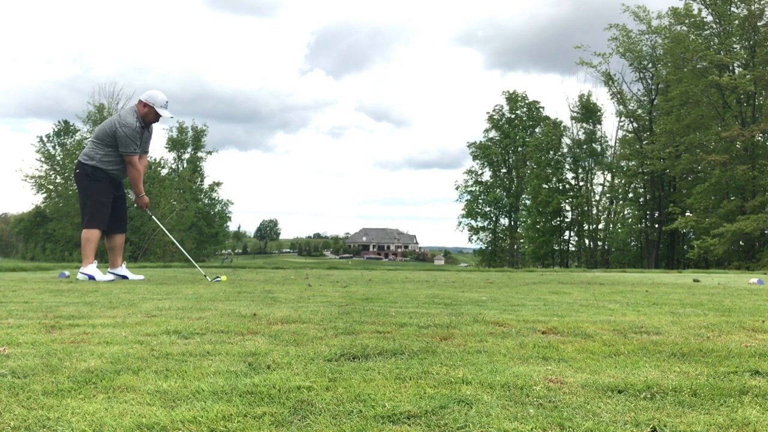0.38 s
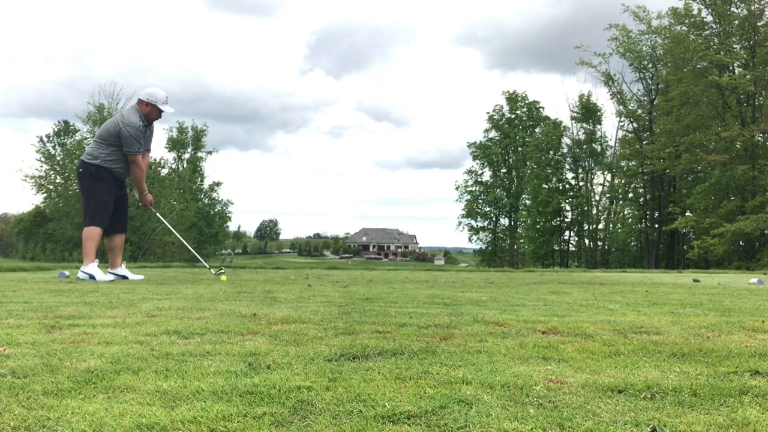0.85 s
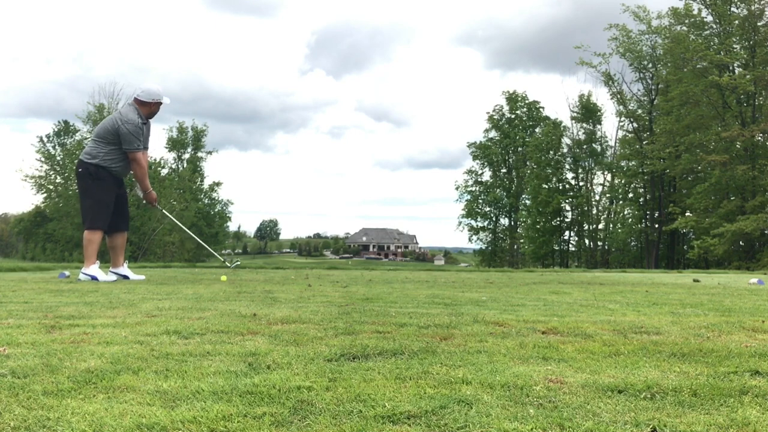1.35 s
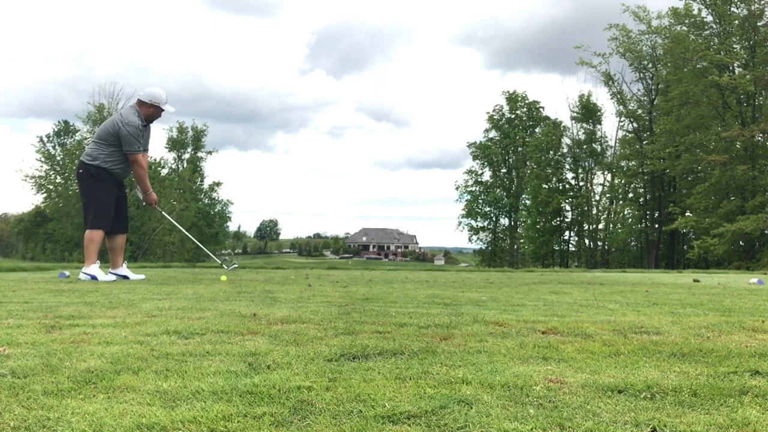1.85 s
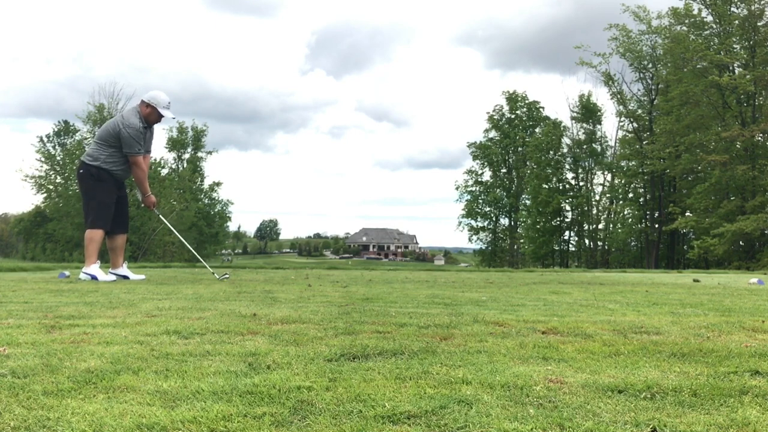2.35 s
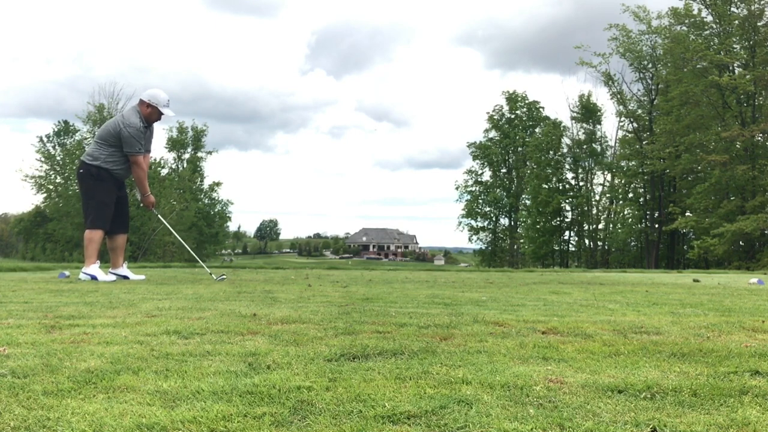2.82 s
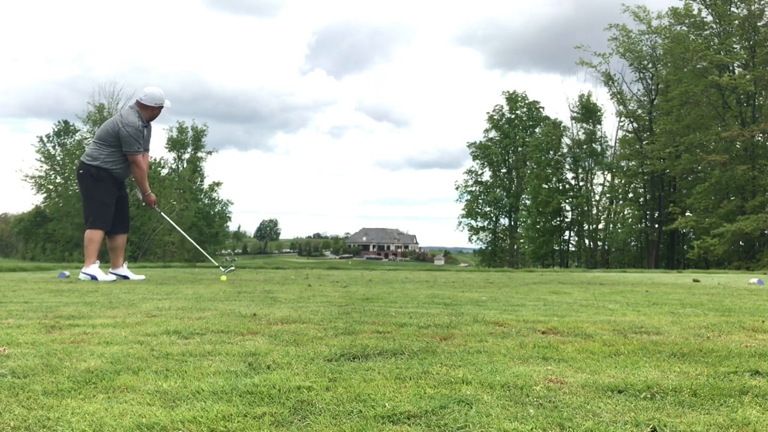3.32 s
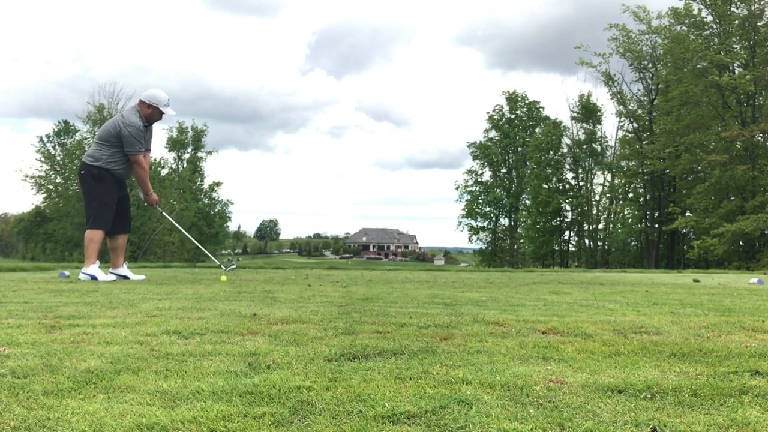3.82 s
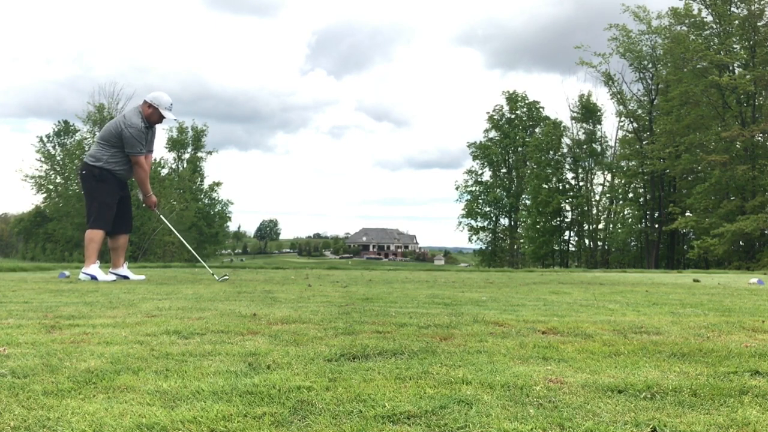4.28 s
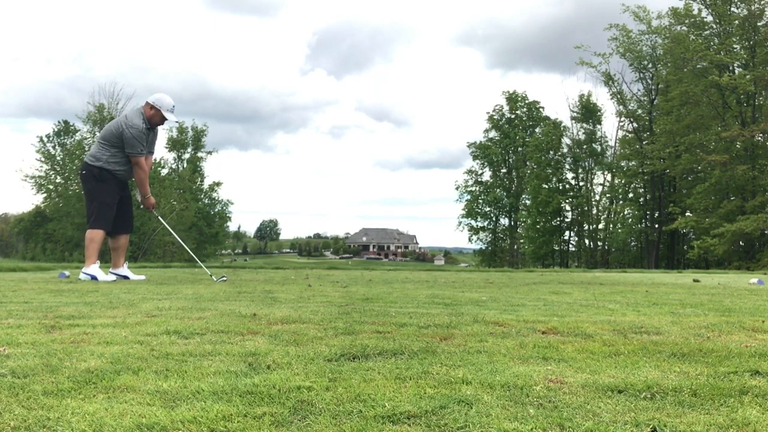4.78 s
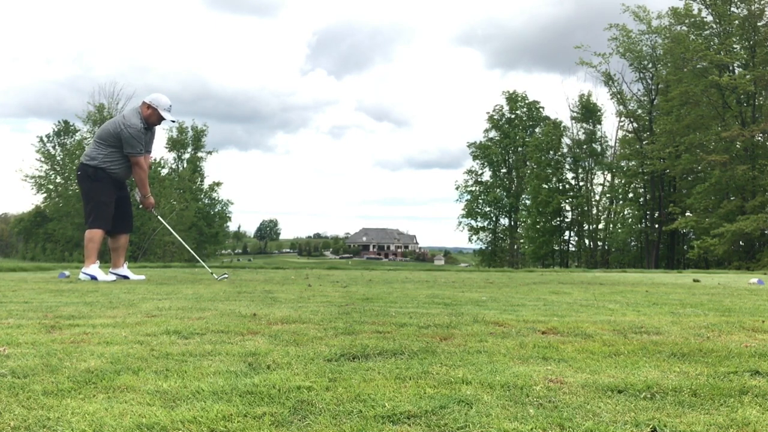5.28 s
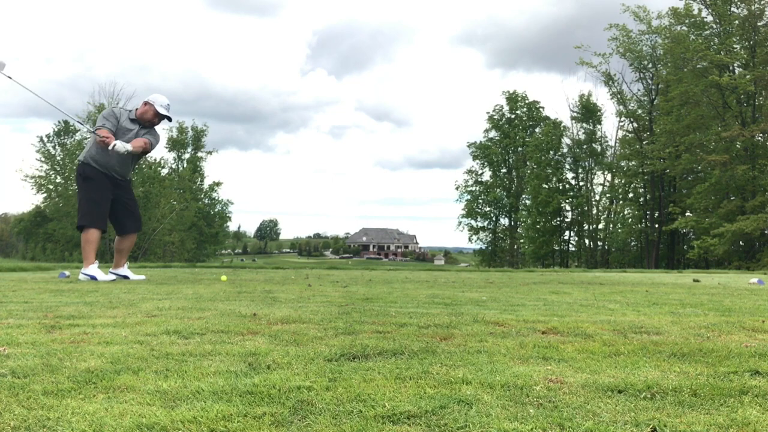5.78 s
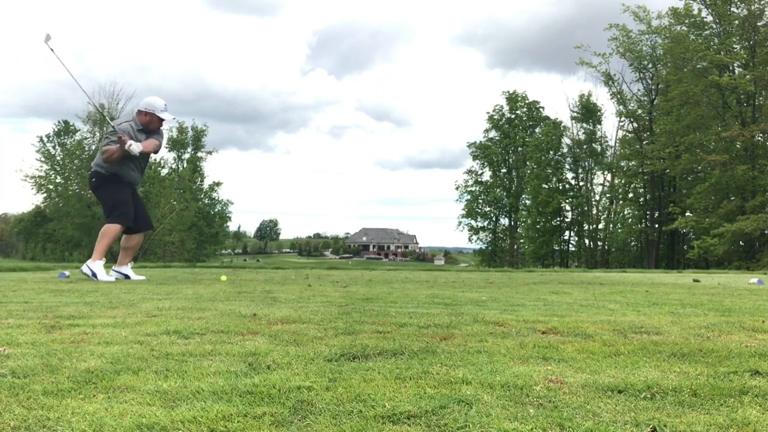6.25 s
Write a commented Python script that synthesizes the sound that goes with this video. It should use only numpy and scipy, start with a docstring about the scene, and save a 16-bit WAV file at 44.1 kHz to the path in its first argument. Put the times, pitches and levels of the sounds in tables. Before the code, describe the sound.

A quiet open golf course, heard by a small microphone close to the ground. Throughout there is low distant traffic rumble, soft road roar growing slightly, a faint wavering engine drone and thin steady hiss. Faint birds give short downward-gliding whistles, smeared by trees: a small cluster at 0.9 to 1.5 seconds, more around 2.1 to 2.3, fainter ones between 3 and 4, then a last few from 5.1 to 5.9. At about 2.24 seconds the club head touches the turf with a tiny tick and soft tap, followed by a short crisp scuff of grass. From about 6.4 seconds a quick swish rises with a low whoosh, and at 6.47 the club strikes the ball: one very loud, dry, bright crack with a hollow pop, extremely short metallic ring and slight ground thud. Rapid reflections and a faint scattered tree echo follow.

```python
"""An open golf course: a club swings through a teed ball, heard by a small microphone close to the ground.
The swing is a rising swish of filtered noise; the strike is a sharp crack of damped sines, a gliding pop
and noise, with echoes off ground and trees. Before it the club head brushes the grass once (clumpy noise),
and far birds chirp (gliding whistles) over traffic rumble, road roar, engine lines and hiss."""
import sys
import numpy as np
from scipy import signal
from scipy.fft import rfft, irfft, next_fast_len
from scipy.io import wavfile
from scipy.ndimage import map_coordinates

SR = 44100
rng = np.random.default_rng(int(sys.argv[2]) if len(sys.argv) > 2 else 0)


def volts(x):
    """Linear amplitude factor 10**(x/20) for a level x in dB, scalar or array-like."""
    e = np.asarray(x, float) / 20
    return 10 ** e


def int16_out(signal):
    """Quantize to a 16-bit WAV file."""
    q = np.round(np.clip(np.atleast_2d(signal).T, -1, 1) * 32767)
    wavfile.write(sys.argv[1], SR, q.astype(np.int16))


N = 292458  # samples in the scene

# top frequency of the steady noises and of the trees' answer to the blow; the final low-pass starts here
STEADY_TOP_HZ = 15800


def unit(x):
    """Scaled to rms 1."""
    return x / np.sqrt(np.mean(x ** 2) + 1e-20)


def along(points, hz):
    """Read a (hz, value) table at any frequency, on a log frequency axis."""
    point_hz, value = np.transpose(points)
    return np.interp(np.log(hz + 1), np.log(point_hz + 1), value)


def curves(rows):
    """One value per sample for each column after the time."""
    time_s, *columns = np.transpose(rows)
    return [np.interp(np.arange(N) / SR, time_s, column) for column in columns]


def during(rows):
    """1 inside a table's time span, with 30 ms edges."""
    t = np.arange(N) / SR
    since_start = t - rows[0][0]
    until_end = rows[-1][0] + .03 - t
    return np.clip(np.minimum(since_start, until_end) / .03, 0, 1)


def wobble(rate):
    """A smooth random curve, rate knots a second."""
    knots = rng.standard_normal(int(N * rate / SR) + 4)
    return map_coordinates(knots, [np.arange(N) * rate / SR])


def coloured(x, gain_db):
    """x through a gain in dB given as a function of frequency."""
    size = next_fast_len(x.shape[-1] + 8192)
    gain = volts(gain_db(np.fft.rfftfreq(size, 1 / SR)))
    return irfft(rfft(x, size) * gain, size)[..., :x.shape[-1]]


def band_limited(x, spectrum):
    """x coloured by a (hz, level_db) table, cut by 120 dB above STEADY_TOP_HZ."""
    return coloured(x, lambda hz: np.where(hz < STEADY_TOP_HZ, along(spectrum, hz), -120))


def noise(spectrum):
    """Coloured, band-limited noise of rms 1."""
    return unit(band_limited(rng.standard_normal(N), spectrum))


def tone(hz, waver):
    """A fuzzy line: a sine of rms 1 whose pitch and strength then drift."""
    wavering_hz = hz * (1 + waver * wobble(6))
    return np.sqrt(2) * volts(4.0 * wobble(7)) * np.sin(2 * np.pi * np.cumsum(wavering_hz) / SR)


def ring(modes, t, attack, scatter_db):
    """Damped sines, each at a slightly new strength at every call."""
    sines = (volts(db + scatter_db * rng.normal() - 60 * t / t60) * np.sin(2 * np.pi * hz * t)
             for hz, db, t60 in modes)
    return sum(sines) * (1 - np.exp(-t / attack))


def add(track, s, sound):
    """Lay a sound on the track at time s."""
    part = track[round(s * SR):][:len(sound)]
    part += sound[:len(part)]


def trees(onset):
    """A scattered answer of energy 1 that builds over the onset time; each frequency dies at its own speed."""
    # how long the trees answer: hz, t60_s
    tree_decay = [(200, 0.53), (1000, 0.34), (4000, 0.77), (15000, .75)]
    hz, t, z = signal.stft(rng.standard_normal(SR // 2), SR, nperseg=256)
    decay = volts(-60 * t / along(tree_decay, hz)[:, None])
    build = 1 - np.exp(-(t / onset) ** 2)
    tail = signal.istft(z * decay * build, SR, nperseg=256)[1]
    return tail / np.linalg.norm(tail)


def face_snap(t):
    """The face snaps onto the ball: a high sine that dies within a fraction of a millisecond."""
    return volts(-6.0) * np.exp(-t / .0001) * np.sin(2 * np.pi * 10500 * t)


def ball_pop(t):
    """The squashed ball swells and lets go within two cycles, its pitch sagging."""
    late = np.clip(t - .0002, 0, .003)
    swell = np.exp(-((t - .0009) / .0008) ** 2)
    return volts(-8) * swell * np.sin(2 * np.pi * (1330 * late - 220000 * late ** 2))


def head_ring(t):
    """The hollow club head rings as damped modes with a short burst of noise."""
    # modes of the head, before scatter: hz, level_db, t60_s
    head_modes = [(2050, -27.5, 0.0083), (2950, -32, 0.0084), (3470, -28.5, 0.007), (4050, -22.5, 0.0068),
                  (4530, -22.5, .008), (4900, -23, 0.0067), (5800, -34, 0.0075), (6200, -17.5, 0.0063),
                  (6940, -22, 0.0069), (7000, -26, 0.0065), (8340, -25, 0.0044), (9240, -41, .006),
                  (9800, -33, 0.0051), (10000, -27, 0.0045), (11400, -22, 0.0044), (12200, -34, .004),
                  (13000, -32, .005), (14200, -35, .004), (15300, -39, .004)]
    burst = volts(-19 - 60 * t / 0.0049) * rng.standard_normal(len(t))
    return ring(head_modes, t, attack=0.00018, scatter_db=4.0) + burst


def turf_thud(t):
    """Tee and soil thud as low damped modes."""
    # modes of tee and soil, before scatter: hz, level_db, t60_s
    turf_modes = [(273, -31, 0.048), (316, -21.5, 0.035), (66.6, -34.5, 0.12), (173, -46, 0.12),
                  (455, -23.5, 0.019)]
    return ring(turf_modes, t, attack=.001, scatter_db=.7)


def strike():
    """Snap, pop and ringing head start together, the thud follows; near surfaces and trees answer."""
    # near reflections of the blow: lag_ms, bass_db, treble_db
    echoes = [(1.5, -45, -5), (2.4, -22, -5), (3.25, -20, -2.5), (3.65, -21, -2.5), (4.3, -32, -7),
              (7.1, -21, -19), (14, -40, -26)]
    # colour of the trees' answer to the blow: hz, level_db_per_hz
    answer_colour = [(120, -30), (200, 2), (500, -9), (950, -11), (2000, -20), (3500, -15.5), (6000, -18),
                     (10000, -21.5), (15800, -23)]
    strike_s = 6.46553
    t = np.arange(SR // 4) / SR
    snap, pop = face_snap(t), ball_pop(t)
    out = np.zeros(N)
    add(out, strike_s, snap + head_ring(t) + pop)
    add(out, strike_s + .0019, -turf_thud(t))
    for lag_ms, bass_db, treble_db in echoes:
        # each surface sees the head from its own side
        treble = 0.33 * snap + head_ring(t)
        add(out, strike_s + lag_ms / 1000, volts(bass_db) * pop + volts(treble_db) * treble)
    answer = band_limited(trees(onset=0.035), answer_colour)
    add(out, strike_s, volts(-22.5) * answer / np.linalg.norm(answer))
    return out


def shaft_swish():
    """Vortices leave the shaft faster as it speeds up; the ground's copy cuts notches that rise."""
    # the pitch climbs, doubling at this pace, until the club is lowest
    bottom_s, slow_hz, fast_hz, doubling_s = 6.456, 2900, 5000, 0.063
    hz, t, z = signal.stft(rng.standard_normal(N), SR, nperseg=128)
    climbing_hz = fast_hz * 2 ** (np.minimum(t - bottom_s, 0) / doubling_s)
    octaves = np.log2((hz[:, None] + 1) / np.maximum(climbing_hz, slow_hz))
    slope_db = np.where(octaves < 0, 7 * octaves, -8.5 * octaves)
    direct = signal.istft(z * volts(slope_db), SR, nperseg=128)[1][:N]
    # the ground's copy closes in as the club drops: 2.3 ms of lag per second to go
    lag_ms = np.clip(2.3 * (bottom_s - np.arange(N) / SR), 0.017, 0.15)
    copy = np.interp(np.arange(N) - lag_ms * SR / 1000, np.arange(N), direct)
    return unit(coloured(direct + .65 * copy, lambda hz: -120 * (hz > STEADY_TOP_HZ)))


def head_whoosh():
    """The broad club head moves air as low noise of unsteady strength."""
    colour = [(120, -37), (300, 3.5), (600, 1.5), (1100, -3.5), (1800, -30), (4000, -57)]  # hz, level_db_per_hz
    return volts(2.5 * wobble(90)) * noise(colour)


def swing():
    """The shaft's swish and the head's whoosh each follow their own level curve through the swing."""
    # course of the swing: time_s, swish_db, whoosh_db (before its wobble)
    swing_levels = [(6.3, -76, -87), (6.392, -66.5, -67), (6.417, -55.5, -54), (6.448, -52.5, -48),
                    (6.457, -67, -44.5), (6.48, -57.5, -47), (6.497, -59, -59), (6.515, -71, -60.5),
                    (6.63, -68.5, -68.5)]
    swish_db, whoosh_db = curves(swing_levels)
    return during(swing_levels) * (volts(swish_db) * shaft_swish() + volts(whoosh_db) * head_whoosh())


def brush():
    """Blades of grass slide under the sole in uneven clumps, with one tick and a soft tap as it lands."""
    # colour of brushed grass: hz, level_db_per_hz
    grass_colour = [(180, -26), (300, 5), (600, -6), (1000, -13), (1500, -24), (2500, -10.5), (3600, -3.5),
                    (4500, -8), (5200, -25), (6300, -7.5), (7600, -12), (9100, -22), (10500, -14),
                    (12000, -10), (13500, -20), (15800, -30)]
    # tap of the sole on the turf, before scatter: hz, level_db, t60_s
    sole_modes = [(300, -51, .03), (557, -55, .02), (850, -56, .018)]
    lands_s, peak_s = 2.2375, 2.258
    since = np.arange(N) / SR - peak_s
    # the stroke rises at 230 dB/s and falls at 98 dB/s
    stroke_db = -59.5 + np.minimum(230 * since, -98 * since)
    out = volts(stroke_db + 2.1 * wobble(260)) * noise(grass_colour)
    t = np.arange(SR // 20) / SR
    tick = volts(-50 - 60 * t / 0.0099) * noise(grass_colour)[:len(t)]
    add(out, lands_s, tick)
    add(out, lands_s, ring(sole_modes, t, attack=.0006, scatter_db=1.5))
    return out


def tree_echo(note, hz):
    """Leaves return high pitches best; the nearest answer comes first and strongest."""
    tail = trees(onset=0.0053)
    near_db = 4 * np.exp(-np.arange(len(tail)) / SR / .04)
    tail = tail * volts(near_db)
    sent = note * volts(10 * np.log2(hz / hz.mean()))  # 10 dB per octave
    return signal.fftconvolve(sent, tail / np.linalg.norm(tail))


def birds():
    """Each note is one gliding whistle with an octave above it, smeared by the trees."""
    # song notes from the trees, before flutter: start_s, length_s, first_hz, last_hz, peak_db, echo_db
    song_notes = [(0.993, 0.032, 5000, 4200, -56, -9), (1.014, .03, 4300, 4050, -58, -3.5),
                  (1.02, 0.031, 2950, 3170, -64, -4), (1.042, 0.012, 3050, 2510, -66, -5),
                  (1.045, 0.053, 3880, 3310, -68.5, 2.5), (1.171, 0.03, 4600, 3800, -61.5, -6),
                  (1.186, 0.0346, 3290, 2590, -70, 2), (1.435, 0.055, 2200, 2550, -77, 0),
                  (2.197, .036, 4550, 3650, -56, -6.5), (2.328, 0.026, 4360, 3830, -62, -3),
                  (2.96, 0.075, 3600, 2970, -83, 6), (3.48, 0.055, 3500, 3240, -80, 0),
                  (3.68, 0.058, 4330, 3040, -68.5, 5), (4.04, .06, 4050, 3690, -81, 0),
                  (3.808, 0.013, 4800, 4350, -74, -10), (5.268, 0.037, 4550, 3000, -70, 4.5),
                  (5.399, .03, 4300, 3500, -66, -2), (5.537, 0.045, 4050, 2900, -70, -2),
                  (5.915, .03, 3950, 2996, -74.5, 0)]
    # a faint low rising tone: same columns as the song
    low_note = (5.5, .12, 643, 769, -67.5, -12)
    # opening chip of each phrase, from a nearer bird, before flutter:
    # start_s, first_hz, last_hz, peak_db, octave_db
    chip_notes = [(.87, 3600, 2050, -61, -18), (2.083, 3330, 2110, -62, -0.5), (3.558, 3290, 2330, -62, -6),
                  (5.121, 3240, 2150, -74, -12)]
    chip_s, chip_echo_db = .041, -9
    chip_bend, song_bend = 1.01, 1.35  # over 1: the glide steepens towards the end
    out = np.zeros(N)
    flutter = volts(2.7 * wobble(130))  # a random roughness in the loudness of every direct note
    tremble = wobble(110)  # the voice is never quite on pitch
    chips = [(s, chip_s, *voice, chip_echo_db, octave_db, chip_bend) for s, *voice, octave_db in chip_notes]
    song = [(*row, -27, song_bend) for row in song_notes + [low_note]]
    for s, length, first_hz, last_hz, db, echo_db, octave_db, bend in chips + song:
        u = np.arange(round(length * SR)) / (length * SR)  # 0 to 1 through the note
        now = slice(round(s * SR), round(s * SR) + len(u))
        glide_hz = first_hz * (last_hz / first_hz) ** u ** bend
        hz = glide_hz * (1 + 0.015 * tremble[now])
        phase = 2 * np.pi * np.cumsum(hz) / SR
        # the octave grows towards the end of the note
        voice = np.sin(phase) + volts(octave_db) * u ** 2 * np.sin(2 * phase)
        note = volts(db) * np.sin(np.pi * u) ** 0.71 * voice
        add(out, s, note * flutter[now])
        add(out, s, volts(echo_db) * tree_echo(note, hz))
    return out


def engines():
    """A far engine gathering speed and steady machinery, each line a wavering sine."""
    # the engine, before drift: time_s, firing_hz, level_db
    engine_course = [(0.0, 57, -60.5), (0.7, 52, -59.5), (1.19, 54, -56), (1.6, 56, -62.5), (2.19, 61, -61),
                     (2.5, 62, -76), (2.92, 71.8, -63), (3.32, 73, -61), (3.7, 68.5, -66.5),
                     (4.81, 79, -63), (5.3, 72, -65.5), (6.4, 72.5, -64.5)]
    # steady machinery, before drift: hz, level_db
    hum_lines = [(137, -75), (172, -80), (187, -78)]
    firing_hz, engine_db = curves(engine_course)
    hum = sum(volts(db) * tone(hz, waver=0.0081) for hz, db in hum_lines)
    return volts(engine_db) * tone(firing_hz, waver=0.0445) + hum


def rumble():
    """Distant traffic rumble: low noise in slow lumps, swelling steadily."""
    # colour of the rumble: hz, level_db_per_hz
    rumble_colour = [(13, -60), (25, -26.5), (40, -6), (52, -1), (75, -2.5), (95, -3.5), (138, -4.5),
                     (150, -9), (205, -21), (300, -20.5), (390, -38), (660, -120)]
    swell_db = 0.57 * np.arange(N) / SR  # 0.57 dB per second
    return volts(-61 + swell_db + 1.2 * wobble(3.01)) * noise(rumble_colour)


def roar():
    """Road roar: mid-band noise that gains 6 dB by the end as traffic nears."""
    # colour of the roar: hz, level_db_per_hz
    roar_colour = [(120, -24.5), (200, -0.5), (524, -9.5), (621, -9.5), (966, -12), (1400, -21),
                   (2200, -35), (2860, -50), (4840, -120)]
    progress = np.arange(N) / (N - 1)
    return volts(-69.5 + 6 * progress ** 2 + 0.75 * wobble(2.28)) * noise(roar_colour)


def hiss():
    """Air and microphone hiss: nearly steady noise."""
    # colour of the hiss: hz, level_db_per_hz
    hiss_colour = [(880, -18), (1500, -2.5), (2230, -2.5), (2770, -3), (3380, -3), (4870, -5), (5830, -6),
                   (7690, -8.5), (8740, -8.5), (10500, -10.5), (11300, -9), (13300, -9), (14500, -9),
                   (15200, -6.5), (16000, -19.5)]
    return volts(-74.5 + 0.21 * wobble(4.1)) * noise(hiss_colour)


def scene():
    """Everything reaches one microphone."""
    background = engines() + rumble() + roar() + hiss()
    return (strike() + swing() + brush() + birds() + background)[None]


def top_cut(x):
    """Nothing passes above the cut-off."""
    return signal.sosfilt(signal.butter(12, 16850, fs=SR, output="sos"), x)


def record(dry):
    """The microphone's housing dents the response; a separate low-pass then closes the treble."""
    # dents of the housing: mid_hz, width_hz, depth_db
    notches = [(4980, 310, -3), (7700, 370, -1.5), (10500, 480, -2)]

    def response_db(hz):
        dents = sum(db * np.exp(-((hz - mid_hz) / width_hz) ** 2) for mid_hz, width_hz, db in notches)
        slope = -np.clip(hz - STEADY_TOP_HZ, 0, None) / 60  # 1 dB per 60 Hz
        low_pass = slope - 120 * (hz > 16700)
        return dents + low_pass

    mix = coloured(dry, response_db)
    return top_cut(mix)


dry = scene()
out = record(dry)
int16_out(out)
```